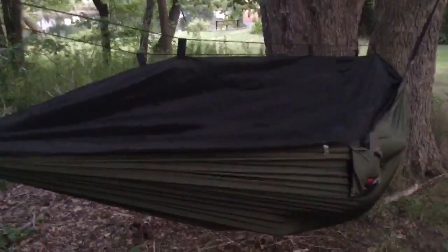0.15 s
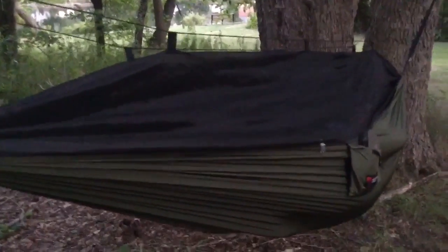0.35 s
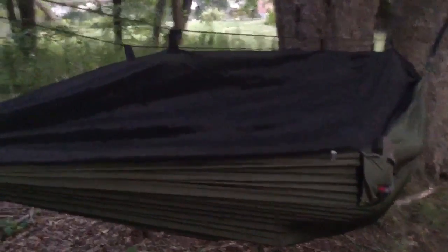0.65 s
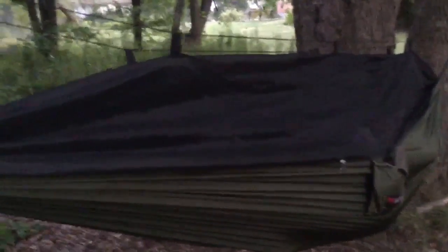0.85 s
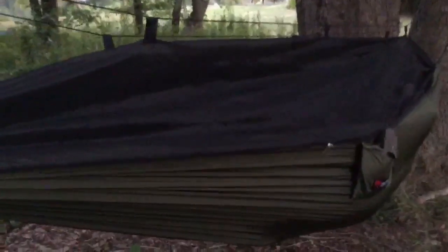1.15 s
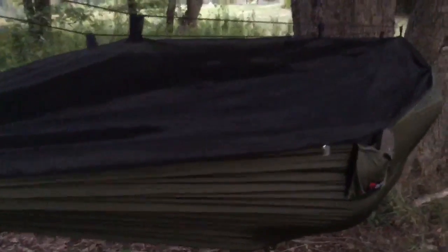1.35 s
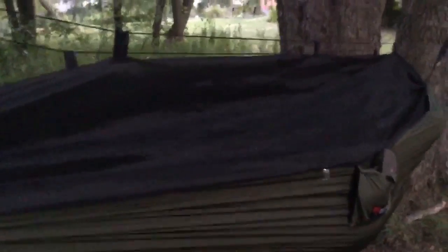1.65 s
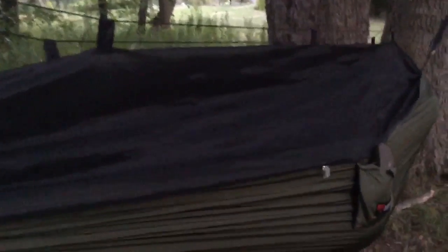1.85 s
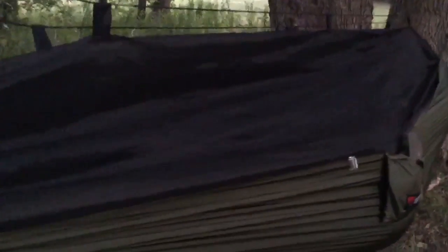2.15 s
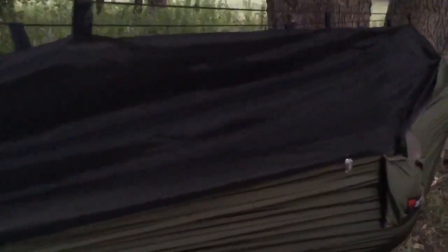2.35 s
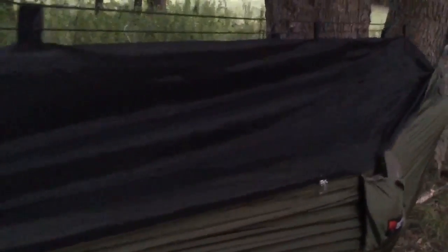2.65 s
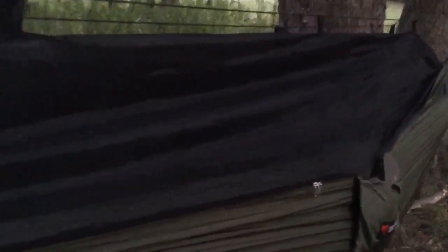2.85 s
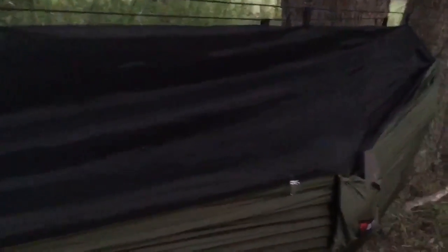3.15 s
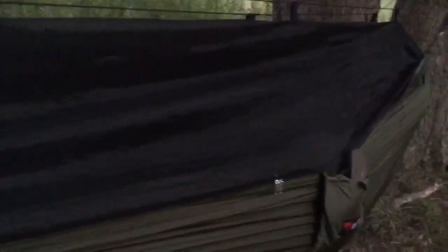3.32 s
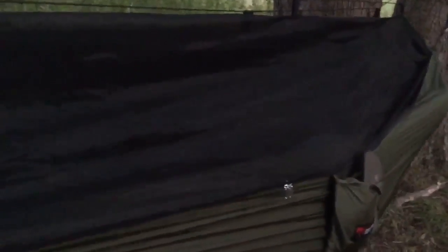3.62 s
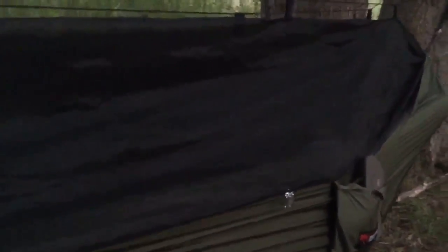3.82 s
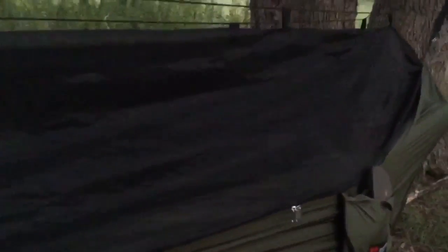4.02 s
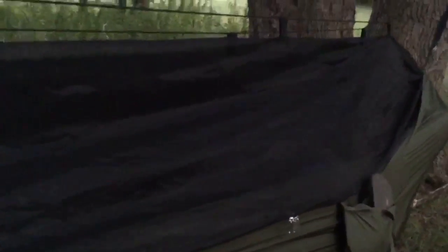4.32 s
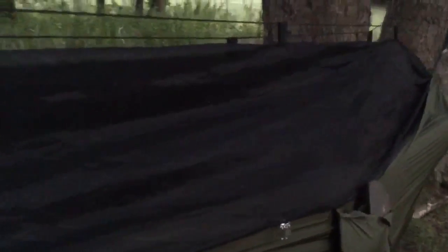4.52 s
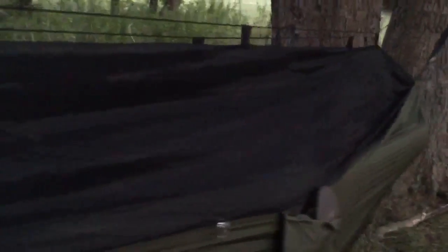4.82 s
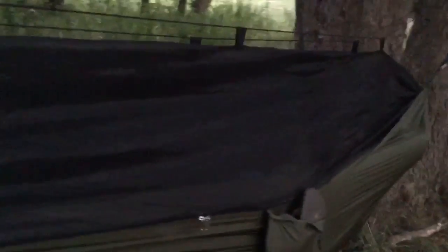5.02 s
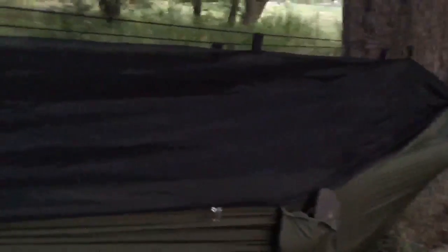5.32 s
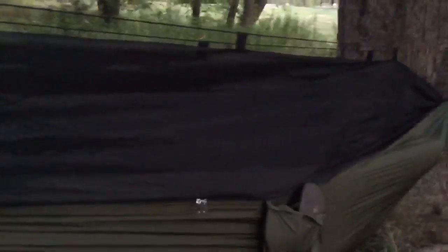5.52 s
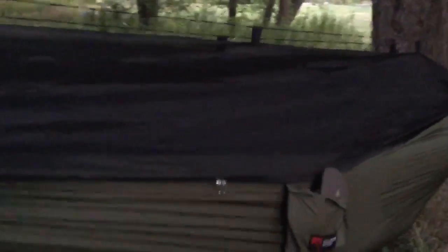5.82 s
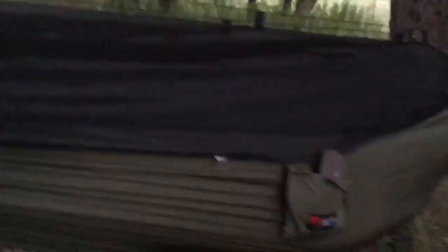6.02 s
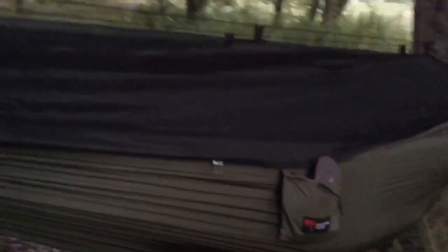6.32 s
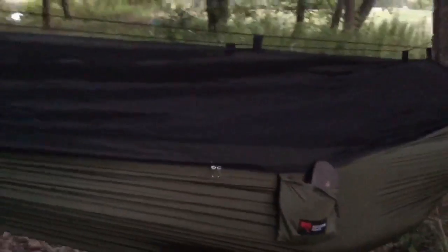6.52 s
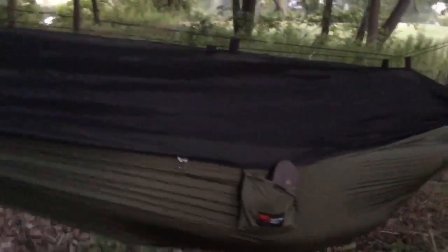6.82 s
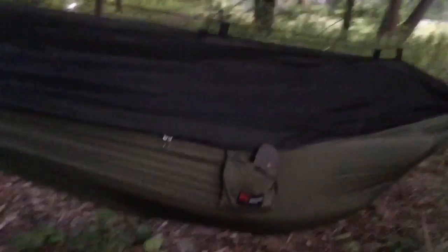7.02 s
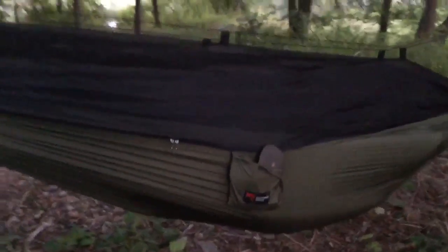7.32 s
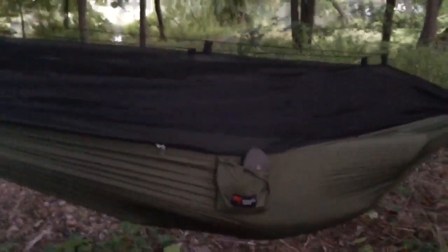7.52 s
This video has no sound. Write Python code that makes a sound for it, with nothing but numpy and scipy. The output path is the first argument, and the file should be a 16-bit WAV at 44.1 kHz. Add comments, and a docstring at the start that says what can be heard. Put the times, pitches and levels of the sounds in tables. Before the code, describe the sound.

Soft steps crinkle dry leaves, a twig snaps, and fingers tick and rub on a plastic case over steady insect hiss and far traffic.

```python
"""Someone steps softly over leaf litter at the edge of a wood, a small camera in hand.
Leaves crinkle underfoot as showers of tiny shaped clicks, heels bump dully and a twig rings once as it snaps.
Close by, fingers rub the plastic case and make it tick: slips and jumps drive one set of resonances.
A sleeve or skin brushes softly in narrow high hisses; insects hold high steady bands of noise over far
traffic, made of filtered noise in open air, and two faint calls, wavering sines, come from the trees."""
import sys
import numpy as np
from scipy import signal
from scipy.fft import rfft, irfft, next_fast_len
from scipy.io import wavfile
from scipy.ndimage import map_coordinates

SR = 44100
rng = np.random.default_rng(int(sys.argv[2]) if len(sys.argv) > 2 else 0)


def bounce(signal):
    """Save signal as a 16-bit WAV file at the path given by the first command-line argument."""
    frames = np.transpose(np.atleast_2d(signal))
    limited = np.clip(frames, -1, 1)
    pcm = np.round(limited * 32767).astype(np.int16)
    wavfile.write(sys.argv[1], SR, pcm)


N = 337754

# Resonances of the plastic case. Each row: frequency in Hz, width in Hz, level in dB.
CASE_MODES = [(2390, 1100, -32.5), (3750, 1450, -20.5), (4940, 1140, -27.5), (6610, 1420, -4),
              (7950, 1700, -0.5), (9600, 2100, -20.5), (11850, 1220, -8), (14300, 2100, -24.5)]


def undb(db):
    """Decibels to gain."""
    return 10 ** (np.asarray(db) / 20)


def unit(x):
    """The same sound at rms 1."""
    return x / np.sqrt(np.mean(x ** 2))


def seconds():
    """The time of every sample."""
    return np.arange(N) / SR


def ring(x, modes):
    """Steep resonances in parallel; neighbouring modes swing in opposite directions."""
    f = np.maximum(np.fft.rfftfreq(len(x), 1 / SR), 1)
    gain = 0
    for k, (hz, width, db) in enumerate(modes):
        resonance = 1 / (1 + 1j * (f * f - hz * hz) / (f * width))
        gain = gain + (-1) ** k * undb(db) * resonance ** 2
    return irfft(rfft(x) * gain, len(x))


def colour(x, points):
    """Causal filter whose response runs through (Hz, dB) points."""
    hz, db = np.transpose(points)
    f = np.maximum(np.fft.rfftfreq(len(x), 1 / SR), 1)
    response_db = np.interp(np.log(f), np.log(hz), db)
    # folding the cepstrum onto positive times gives minimum phase
    cepstrum = irfft(np.log(undb(response_db)), len(x))
    cepstrum[1:len(x) // 2] *= 2
    cepstrum[len(x) // 2 + 1:] = 0
    return irfft(rfft(x) * np.exp(rfft(cepstrum)), len(x))


def noise(size=N):
    """White noise, at least size samples long."""
    return rng.standard_normal(next_fast_len(size, True))


def band(hz, width_hz):
    """Noise in one resonance, rms 1."""
    return unit(ring(noise(), [(hz, width_hz, 0)])[:N])


def walk(rate):
    """Smooth random drift with rate new values a second; spread near 1."""
    knots = rng.standard_normal(4096)
    return map_coordinates(knots, [seconds() * rate], order=2, mode="wrap")


def grains(size, rate, spread_db):
    """Tiny slips at random moments, about rate a second, a few much larger than the rest."""
    sign = np.sign(noise(size))
    strength = undb(spread_db * np.minimum(rng.exponential(size=len(sign)), 4))
    happens = rng.random(len(sign)) < rate / SR
    return sign * strength * happens


def add(out, s, x):
    """Mix a short sound in at time s."""
    i = int(round(s * SR))
    out[i:i + len(x)] += x[:len(out) - i]


def push(top, length, rise_share, shape, uneven_db, uneven_rate):
    """A pressure that swells unevenly to its hardest moment and lets go: its start time and its course."""
    rise = length * np.clip(rise_share, .05, .95)
    t = np.arange(max(int(length * SR), 128)) / SR
    uneven = map_coordinates(rng.standard_normal(256), [t * uneven_rate], order=1, mode="wrap")
    swell = np.interp(t, [0, rise, length], [0, 1, 0]) ** shape
    return top - rise, swell * undb(uneven_db * uneven)


def crumple(top, length, rise_share, hz, octaves, db, lowest_hz=350):
    """Many tiny slips under a passing pressure, from crackle to hiss: the start time and the sound."""
    f = np.geomspace(30, SR / 2, 48)
    start, pressure = push(top, length, rise_share, shape=0.48, uneven_db=2.5, uneven_rate=87.0)
    # a broad or narrow hump around the centre, with no bass
    hump = (1 + (np.log2(f / hz) / octaves) ** 2 / 2) ** 2
    bass_cut = (1 + (lowest_hz / f) ** 2) ** 2
    hump_db = -10 * np.log10(hump * bass_cut)
    slips = grains(len(pressure), rate=3800, spread_db=3.5)
    crackle = colour(slips, np.c_[f, hump_db])
    return start, undb(db) * pressure * unit(crackle[:len(pressure)])


def footsteps():
    """Slow steps crush the litter in a fine crackle, and single leaves and chips crack."""
    # A foot presses into the litter. Each row: full weight in seconds, level in dB, length in seconds,
    # crackle centre in Hz, crackle width in octaves.
    steps = [(0.583, -67.5, 0.35, 9000, 0.93), (1.219, -64.5, .39, 9000, 2.3),
             (1.417, -65.5, 0.24, 8000, 1.5), (1.803, -70, 0.5, 6000, 1.4), (2.207, -58.5, 0.21, 7000, 2.6),
             (2.4, -63.5, 0.4, 4000, 4.2), (3.552, -70, 0.33, 10000, 1.2), (3.941, -67.5, 0.14, 5000, 2.2),
             (4.278, -69.5, .29, 10000, 1), (5.275, -68, .11, 3040, 0.8), (6.111, -64, .23, 6000, 2.8),
             (6.277, -58.5, 0.1, 13000, 1.3), (6.826, -65.5, .08, 5000, 0.4)]
    # A single leaf or chip cracks. Each row: hardest moment in seconds, level in dB, centre in Hz.
    cracks = [(.538, -59, 14500), (0.951, -64, 2200), (2.23, -51, 11000), (2.456, -58, 11000),
              (2.608, -61, 6000), (5.799, -63, 1700), (6.75, -62.5, 5000), (6.789, -62, 4300),
              (6.829, -62, 1700), (6.946, -55, 2200)]
    out = np.zeros(N)
    for s, db, length, hz, octaves in steps:
        # the weight comes on faster than it leaves
        add(out, *crumple(s, length, rise_share=.4, hz=hz, octaves=octaves, db=db))
    for s, db, hz in cracks:
        add(out, *crumple(s, length=.012, rise_share=0.26, hz=hz, octaves=0.55, db=db))
    return out


def heel_bumps(length_s=0.029, width_hz=260):
    """A heel pushes softly into earth: a short, dull swell of resonant noise."""
    # Each row: time in seconds (a quarter length after the start), resonance in Hz, level in dB.
    bumps = [(1.021, 525, -62), (5.729, 990, -60.5), (6.305, 750, -57), (6.53, 476, -62),
             (6.975, 700, -60.5), (7.374, 644, -57)]
    out, swell = np.zeros(N), np.hanning(int(length_s * SR))
    for s, hz, db in bumps:
        earth = ring(noise(size=4096), [(hz, width_hz, 0)])[:len(swell)]
        add(out, s - length_s / 4, undb(db) * swell * unit(earth))
    return out


def twig(snap_s=2.7993, snap_db=6.5, split_s=0.0025, split_db=-20,
         splinter_db=-31, splinter_t60=0.025, wood_db=-58, wood_t60=0.13):
    """One woody snap, a lesser split just after, splinters, and a faint scatter from the trunks."""
    # Resonances of the twig. Each row: frequency in Hz, width in Hz, level in dB.
    twig_modes = [(915, 2000, -17.5), (2190, 990, 0), (4400, 2100, -26.5), (11000, 6800, -20)]
    t = np.arange(SR // 4) / SR
    splinters = undb(splinter_db - 60 * t / splinter_t60)
    scatter = undb(wood_db - 60 * t / wood_t60)
    force = rng.standard_normal(len(t)) * (splinters + scatter)
    force[0] += 1
    force[int(split_s * SR)] += undb(split_db)
    out = np.zeros(N)
    add(out, snap_s, undb(snap_db) * ring(force, twig_modes))
    return out


def case_ticks(jump_share=0.23, main_ring_hz=7830, rattle_db=-25, rattle_t60=0.0058,
               rebound_s=.0044, rebound_knock_db=5.5):
    """The shell gives way in two jumps, chatters and springs back: a brief bright ring over a dull knock."""
    # The case ticks under the grip. Each row: start in seconds, ring in dB, dull knock in dB,
    # brightness in dB an octave, second jump's lag in seconds, rebound's relative level in dB.
    ticks = [(0.8588, -6, -24, -10, 0.0003, -27), (4.58, 10, -17, 0.5, 0.0005, -6),
             (4.7465, -15, -40, 0, .0008, -30), (5.0115, -14.5, -31, -5, .0008, -30),
             (5.1856, 11.5, -15, 7.5, 0.00042, -50), (5.4643, 9.5, -10.5, -7.5, .00027, -17.5),
             (6.022, -21, -30, 8, 0.00056, -30), (6.661, -16, -32, 19, 0.0013, -30),
             (6.679, -18, -39, 10, 0.00076, -30), (6.9214, 4.5, -3.5, -5, 0.000613, -16.5),
             (7.3781, -7, -27, 1, 0.00069, -40), (7.466, -12.5, -38, 9, .00064, -30),
             (7.491, -8, -44, 9, .00037, -30), (7.504, -4, -34, 7, .00046, -16)]
    # Colour of the whole case's dull knock. Each row: frequency in Hz, level in dB.
    knock_colour = [(60, -36), (200, -2.5), (450, 1.5), (1000, 0), (1800, -4), (3000, -2), (4500, -8.5),
                    (9000, 3.5), (16000, -63)]
    out, t = np.zeros(N), np.arange(2048) / SR
    for s, ring_db, knock_db, bright_db, lag, rebound_db in ticks:
        # the lag between the jumps decides which resonances add up and which cancel
        second_jump = jump_share * np.sinc((t - lag) * SR)
        jumps = ((t == 0) + second_jump) / np.hypot(1, jump_share)
        rattle = rng.standard_normal(len(t)) * undb(rattle_db - 60 * t / rattle_t60)
        force = jumps + rattle
        # brightness tilts the resonances about the main ring
        modes = [(hz, width, db + bright_db * np.log2(hz / main_ring_hz)) for hz, width, db in CASE_MODES]
        shell = undb(ring_db) * ring(force, modes)
        knock = undb(knock_db) * colour(force, knock_colour)
        add(out, s, shell + knock)
        # the rebound has more knock against its ring
        add(out, s + rebound_s, undb(rebound_db) * (shell + undb(rebound_knock_db) * knock))
    return out


def finger_rubs(skin_db=-22, skin_hz=12000, skin_width_hz=11000, pad_hz=700, pad_width_hz=1500):
    """Skin sticks and slips thousands of times a second, ringing the same shell and hissing a little."""
    # A finger slides on the case. Each row: hardest moment in seconds, level in dB, length in seconds,
    # dull scrape's relative level in dB.
    rubs = [(0.173, -63, 0.057, -24), (1.03, -52, 0.076, -13), (2.854, -57, 0.087, -20),
            (3.775, -61, .06, -22), (4.19, -63, 0.042, -22), (4.649, -58.5, 0.068, -26),
            (4.76, -53, 0.062, -9.5), (5.012, -52, .055, -15), (5.211, -64, 0.053, -22),
            (5.494, -50, 0.014, -20), (5.705, -45.5, .11, -15.5), (6.064, -53, 0.036, -20),
            (6.141, -56.5, 0.033, -7), (6.303, -59, 0.076, 2), (6.545, -53.5, 0.12, -16),
            (6.668, -49, .05, -26), (6.993, -43, .078, -13), (7.171, -42.5, 0.058, -20),
            (7.197, -39, 0.043, -23), (7.238, -41.5, 0.046, -19), (7.396, -53, 0.036, -9),
            (7.478, -46, 0.075, -19)]
    out = np.zeros(N)
    for top, db, length, scrape_db in rubs:
        # a stroke builds up for longer than it takes to let go
        start, force = push(top, length, rise_share=.63, shape=0.7, uneven_db=2.5, uneven_rate=293)
        slips = grains(len(force), rate=4500, spread_db=2.5)
        skin = grains(len(force), rate=4500, spread_db=2.5)
        # the soft finger pad adds a dull scrape
        skin_modes = [(pad_hz, pad_width_hz, scrape_db), (skin_hz, skin_width_hz, skin_db)]
        rub = ring(slips, CASE_MODES) + ring(skin, skin_modes)
        add(out, start, undb(db) * force * unit(rub[:len(force)]))
    return out


def soft_brushes():
    """A sleeve or skin brushes high and soft: tiny slips in a narrow high hiss."""
    # Each row: hardest moment in seconds, level in dB.
    brushes = [(4.85, -69.5), (5.11, -67), (5.62, -57), (6.85, -66), (7.045, -62), (7.63, -69.5)]
    out = np.zeros(N)
    for s, db in brushes:
        add(out, *crumple(s, length=0.13, rise_share=0.36, hz=10500, octaves=0.29, db=db))
    return out


def insects(flicker_db=0.5, spell_db=-78.0, spell_s=0.061):
    """Many small singers merge into steady high bands; a narrower, lower one comes and goes."""
    # Insect choruses. Each row: frequency in Hz, width in Hz, level in dB.
    choruses = [(7944, 700, -68.5), (7410, 730, -74.5), (5580, 1500, -77.5)]
    # A nearer insect buzzes in spells. Each entry: middle in seconds.
    spell_middles = [.53, .98, 1.76, 2.2, 2.58, 3.45, 3.95, 4.55, 4.95]
    chorus = sum(undb(db + flicker_db * walk(30)) * band(hz, width) for hz, width, db in choruses)
    spells = sum(np.exp(-((seconds() - s) / spell_s) ** 2) for s in spell_middles)
    return chorus + undb(spell_db) * spells * band(hz=5060, width_hz=260)


def far_calls(flutter_db=5.0):
    """Thin whistles from the trees: gliding sines of wavering pitch and fluttering level that swell quickly."""
    # Each row: start, loudest moment and end in seconds, first and last pitch in Hz, level in dB,
    # waver as a share of pitch.
    calls = [(-.04, .04, .21, 1030, 860, -63, .012), (7.03, 7.11, 7.44, 3730, 3660, -71.5, .016)]
    t, out = seconds(), 0
    for start, top, end, first_hz, last_hz, db, waver in calls:
        glide_hz = np.interp(t, [start, end], [first_hz, last_hz])
        hz = glide_hz * (1 + waver * walk(400))
        swell = np.sqrt(np.interp(t, [start, top, end], [0, 1, 0]))
        whistle = np.sin(2 * np.pi * np.cumsum(hz) / SR)
        out = out + undb(db + flutter_db * walk(40)) * swell * whistle
    return out


def passing(nearest_s, fade_s):
    """Gain of a source that goes by at a steady speed, one over its distance: 3 dB down after fade_s."""
    return 1 / np.hypot(1, (seconds() - nearest_s) / fade_s)


def distance(octave_db=-14, rumble_db=-69.5, hum_db=-72):
    """Noise bands of open air, an engine droning, a car rumbling by, a brief hum and tyres on a far road."""
    # Open air. Each row: frequency in Hz, level in dB per Hz.
    air_colour = [(25, -124), (52, -120), (68, -100), (110, -96), (155, -90), (240, -90.5), (340, -95.5),
                  (550, -101), (1100, -100), (2000, -107), (3200, -112.5), (6500, -113), (10000, -110.5),
                  (15500, -112.5)]
    # A far engine drones and eases off. Each row: time in seconds, level in dB.
    drone_levels = [(0, -72), (1.1, -71), (1.4, -63), (1.7, -68.5), (3.3, -66.5), (4.3, -69.5),
                    (6.6, -76.5), (7.66, -72)]
    # Tyres on the far road. Each row: time in seconds, level in dB.
    tyre_levels = [(0, -69.5), (.6, -70.5), (1.1, -69), (3.3, -68.5), (3.9, -63.5), (4.3, -67.5),
                   (6.2, -67), (6.7, -68), (7.66, -65.5)]
    t = seconds()
    air = colour(noise(), air_colour)[:N] * np.sqrt(SR / 2)
    drone = band(hz=195.6, width_hz=29.3) + undb(octave_db) * band(hz=384.4, width_hz=46)
    engine = undb(np.interp(t, *np.transpose(drone_levels))) * drone
    rumble = unit(ring(noise(), [(84.4, 25, -3.5), (135.0, 35, -1)])[:N])
    car = undb(rumble_db) * passing(nearest_s=4.25, fade_s=0.44) * rumble
    hum = undb(hum_db) * passing(nearest_s=1.99, fade_s=0.15) * band(hz=392, width_hz=32)
    tyres = undb(np.interp(t, *np.transpose(tyre_levels))) * band(hz=990, width_hz=754)
    return air + engine + car + hum + tyres


def scene():
    """Everything meets at one microphone."""
    underfoot = footsteps() + heel_bumps() + twig()
    in_hand = case_ticks() + finger_rubs() + soft_brushes()
    background = insects() + far_calls() + distance()
    return (underfoot + in_hand + background)[None]


def record(dry, top_hz=15750):
    """The camera cuts the top: a steep elliptic low-pass."""
    low_pass = signal.ellip(10, .2, 70, top_hz, fs=SR, output="sos")
    return signal.sosfilt(low_pass, dry)


dry = scene()
out = record(dry)
bounce(out)
```